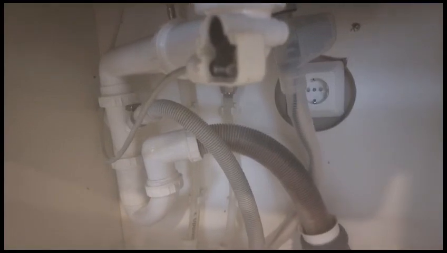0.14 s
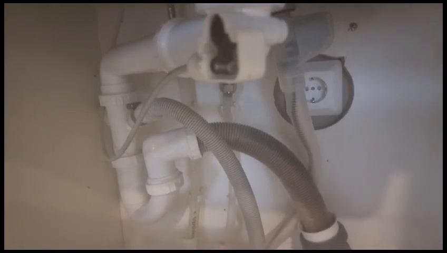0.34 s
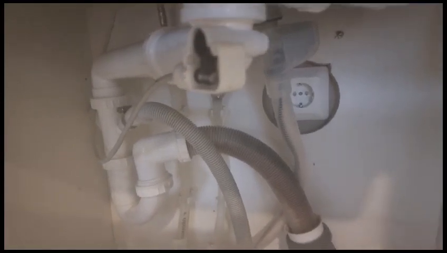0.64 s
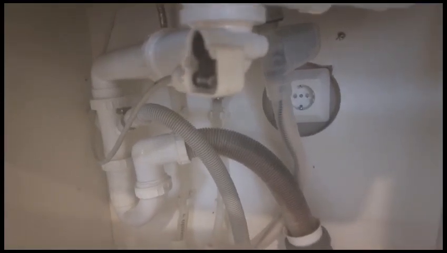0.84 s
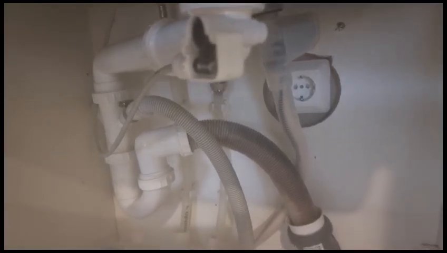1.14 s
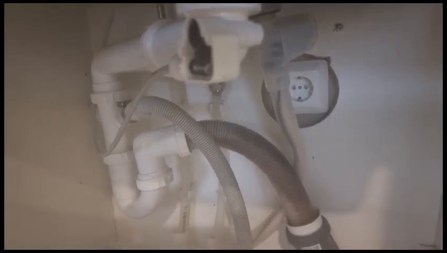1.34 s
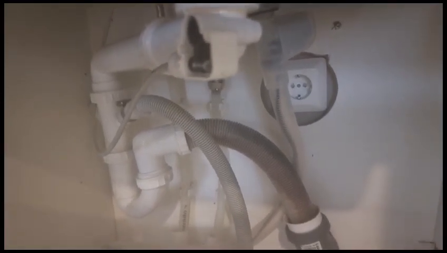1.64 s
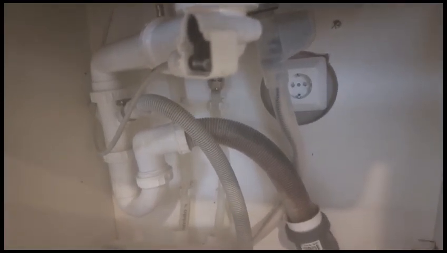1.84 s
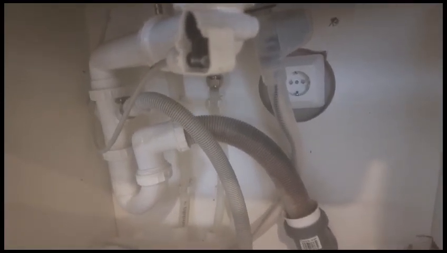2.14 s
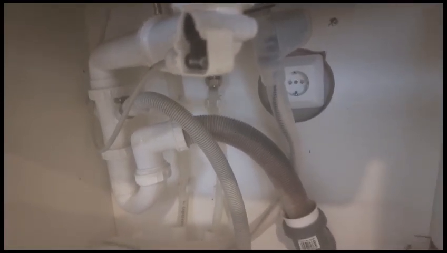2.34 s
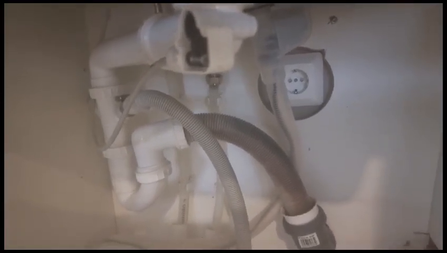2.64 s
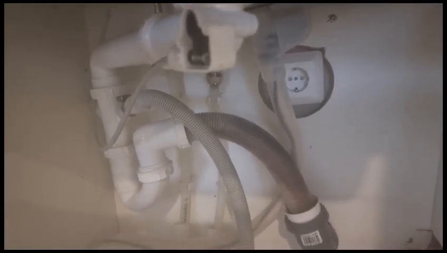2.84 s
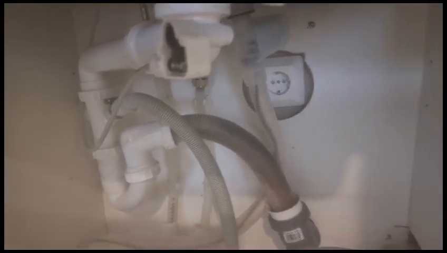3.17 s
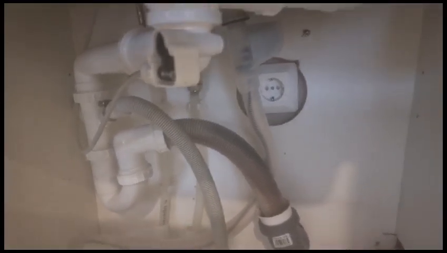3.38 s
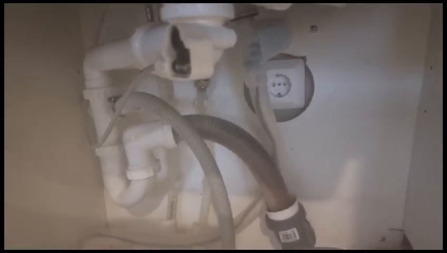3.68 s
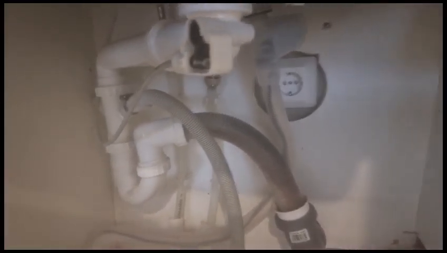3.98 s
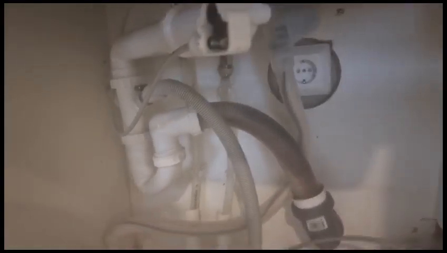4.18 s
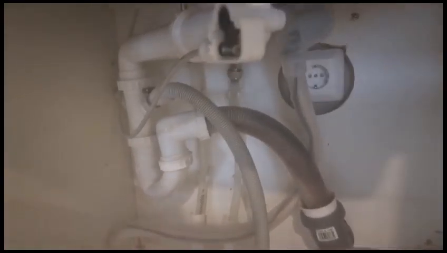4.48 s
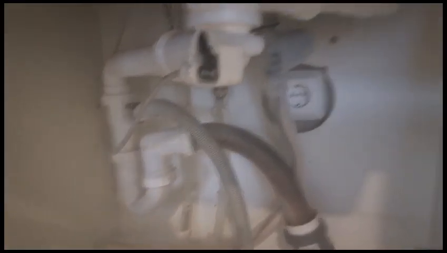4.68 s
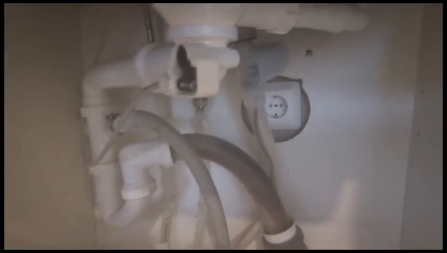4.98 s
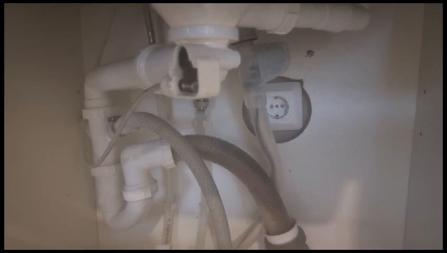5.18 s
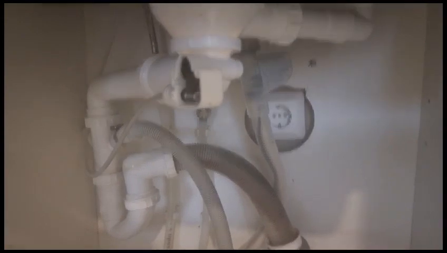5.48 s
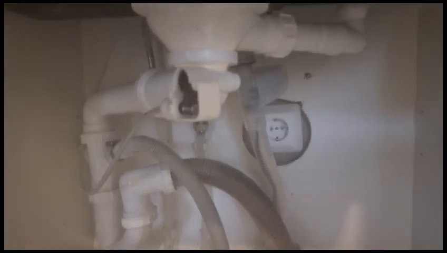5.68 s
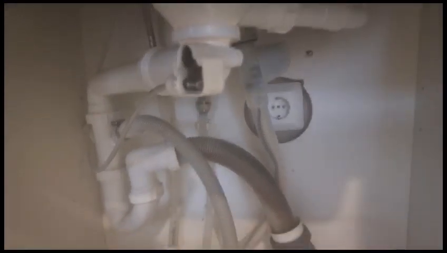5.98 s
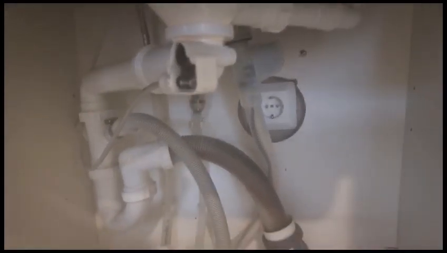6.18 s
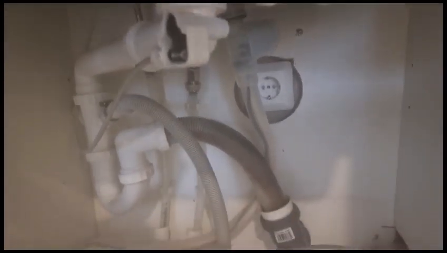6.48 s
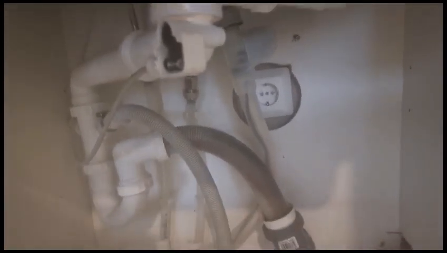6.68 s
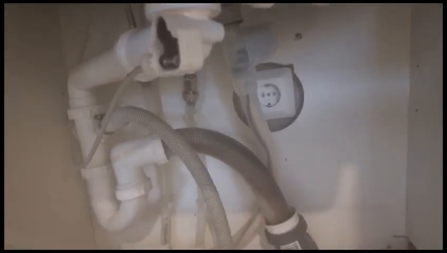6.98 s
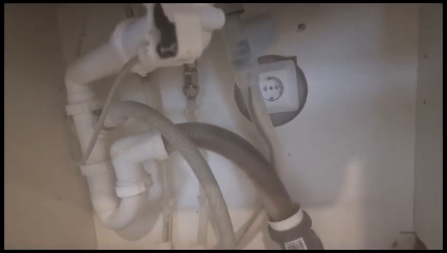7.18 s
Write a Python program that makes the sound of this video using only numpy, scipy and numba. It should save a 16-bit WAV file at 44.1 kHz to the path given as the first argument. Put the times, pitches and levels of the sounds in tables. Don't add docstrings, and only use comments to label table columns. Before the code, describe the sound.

A dense, even roar of running water fills a closed sink cupboard, ringing on a few low hollow notes. It falls away quickly into heavy, dull pipe thumps and gulps of trapped air. Bubbles glug and pop, water knocks the pipe and bright droplets patter, ever sparser. One late dull thump with a plastic click interrupts the last tiny drips. Heard nearby on a phone, dry and boxy.

```python
import sys
import numpy as np
from scipy import signal
from scipy.fft import rfft, irfft, next_fast_len
from scipy.io import wavfile
from scipy.ndimage import uniform_filter1d
from numba import njit

SR = 44100
rng = np.random.default_rng(int(sys.argv[2]) if len(sys.argv) > 2 else 0)


def boost(x):
    u = np.asarray(x, float) / 20
    return 10 ** u


def unload_audio(sound):
    columns = np.transpose(np.atleast_2d(sound))
    steps = np.round(np.clip(columns, -1, 1) * 32767)
    wavfile.write(sys.argv[1], SR, steps.astype(np.int16))


N = 322812

# [f/Hz, level/dB per Hz]
RUSH_COLOUR = [(20, -43), (60, -10), (120, 2), (240, -20), (640, -19.5), (1400, -20), (2100, -15),
               (4000, -17.5), (6400, -12.5), (7600, -15.5), (8700, -25), (12000, -22.5), (14500, -21.5)]
# [f/Hz, width/Hz, lift/dB]
CUPBOARD_MODES = [(92, 22, -2), (117, 11, 6.5), (169.6, 7.9, 10), (282.4, 7.4, 11), (366, 7.8, 12.5),
                  (536, 43, 10), (770, 57, 8.5), (1200, 96, 5)]
# [level/dB], [start of the fall t/s], [fall/dB per s]
TAP_DB, TAP_SHUTS_S, TAP_FALL_DB_PER_S = (-39, -39, -32), (2.655, 2.696, 2.75), (73, 35.5, 49)
TAP_DRY_S = 3.2

# [f/Hz, level/dB per Hz]
KITCHEN_COLOUR = [(20, 8), (90, -10), (280, -20), (480, -22), (1400, -39), (2800, -58), (6400, -12),
                  (9500, -14), (14500, -8)]
# [t/s, boom level/dB, middle level/dB, hiss level/dB]
KITCHEN_LEVELS = [
    (0, -65, -56.5, -85),
    (7.32, -65, -77, -74.5),
]
# [f/Hz, width/Hz, lift/dB]
KITCHEN_MODES = [(95, 27, 12), (361, 23, 14)]
HUM_HZ, HUM_DB = 361, -87.5

# [t/s, peak level/dB, f/Hz,
# ring/cycles]
GULPS = [(2.459, -40, 394, 3.3), (2.561, -36, 366, 51), (2.59, -28.5, 485, 5.7), (2.784, -46, 228, 4),
         (2.861, -35, 452, 12), (2.866, -40.5, 283, 8.2), (2.79, -40.5, 288, 8.8), (2.785, -41, 695, 8),
         (2.689, -37, 292, 6.1), (2.954, -44, 342, 13), (3.061, -49.5, 361, 22), (4.501, -49, 200, 2.8),
         (4.659, -48, 361, 11), (4.697, -44, 368, 4.4), (5.274, -52, 332, 4.2), (6.629, -45.5, 151, 4),
         (6.975, -61, 330, 4), (5.89, -65, 1400, 220), (6.09, -73, 1380, 250), (6.25, -75, 1400, 190),
         (7.06, -79, 1430, 160)]
# [t/s, peak level/dB, f/Hz, push/ms, ring/cycles]
THUDS = [(2.79, -16.5, 92, 21, 0.87), (2.825, -19.5, 85.5, 22, 1.3), (2.872, -16, 88, 7.2, 2.6),
         (2.901, -19, 98, 10.4, 3.5), (2.941, -26, 100, 17, 3.6), (2.996, -33, 83, 14, 4.3),
         (4.015, -43, 112, 31, 5), (4.075, -42, 100, 29, 2.4), (4.492, -38.5, 103.4, 22, 1.2),
         (4.617, -41, 96.9, 26, 1.8), (4.678, -41, 95, 14, 1.6), (6.19, -46.5, 72, 16, 1.7),
         (6.558, -48, 74, 14, 1.8), (6.584, -49, 56.5, 21, 2), (6.64, -41, 53.8, 9, 1),
         (6.975, -43, 92, 23, 3)]
# [t/s, peak level/dB, f/Hz]
CLICKS = [
    (6.631, -51, 400),
    (6.631, -54, 930),
    (6.632, -54, 2300),
    (4.508, -34.5, 67),
]

# [f/Hz, level/dB per Hz]
TRICKLE_COLOUR = [(20, -16), (60, 0.5), (110, 6.5), (200, -21.5), (470, -29.5), (640, -22), (900, -14.5),
                  (2000, -14), (3000, -17), (5000, -15), (6700, -12), (7700, -17), (8700, -26.5),
                  (14500, -25.5)]
# [f/Hz, width/Hz, lift/dB]
EMPTY_PIPE_MODES = [(104, 43, 1.5), (361, 104, 11), (553, 40, 19), (1400, 32, -22)]
# [t/s, flow level/dB, level/dB of the air dragged along]
DRAIN = [(2.9, 14.5, -6), (3.0, 5.5, -3.5), (3.12, -2, 4), (3.26, 2, -0.5), (3.6, 1.5, -0.5),
         (4.03, 0, 2.5), (4.34, -0.5, 1), (4.7, -1, 2.5), (5.07, -2, -2), (5.3, -2, -2), (5.72, -4.5, -8.5),
         (5.84, -10.5, -5.5), (6.26, -19, 7), (6.5, -18.5, -0.5), (6.62, -13.5, -6), (6.8, -26.5, -1.5),
         (7.1, -24, 2.5), (7.33, -21.5, -4.5)]
# [level/dB at 0 dB flow and air], [dB per dB of flow], [dB per dB of
DRAIN_DB, PER_FLOW, PER_AIR = (-54.5, -52.5, -47.5), (0.65, 1.33, 1), (0.97, 0.94, 0)

# [t/s, peak level/dB, f/Hz]
GLUGS = [(2.937, -44, 2230), (3.115, -34, 1730), (3.119, -35.5, 2330), (3.29, -38, 1130),
         (3.419, -29.5, 1200), (3.52, -38, 1960), (3.567, -32, 1950), (3.728, -38, 2200),
         (3.796, -33, 1890), (3.91, -37, 2030), (3.94, -39, 2340), (4.081, -36.5, 920),
         (4.228, -42.5, 1130), (4.285, -45, 1780), (4.318, -38, 1050), (4.382, -29, 1020),
         (4.409, -36, 2040), (4.474, -35.5, 1290), (4.584, -37, 1000), (4.63, -35.5, 1740),
         (4.673, -39.5, 880), (4.026, -41, 770), (5.003, -41, 1970), (5.19, -39.5, 2380),
         (5.275, -45, 1230), (5.571, -46, 2410), (5.869, -51, 960), (5.978, -50, 1320), (6.07, -54, 1420),
         (6.582, -65, 2600), (6.631, -51.5, 1680)]
# [t/s, peak level/dB, f/Hz]
MORE_GLUGS = [(2.91, -34, 1100), (3.085, -31, 1100), (3.182, -41, 1060), (3.22, -39, 2360), (3.253, -37, 2650),
              (3.313, -41, 930), (3.124, -30, 1080), (3.443, -39, 816), (3.479, -40, 1590), (3.507, -38, 800),
              (3.551, -33, 1960), (3.612, -37, 2410), (3.652, -36, 1990), (3.814, -36, 1910), (3.824, -32, 1950),
              (4.043, -42, 810), (4.105, -40, 1220), (4.184, -42, 770), (4.744, -39, 770), (4.86, -48, 1560),
              (4.891, -37, 1090), (4.939, -40, 2460), (4.975, -43, 1950), (5.023, -36, 1220), (5.094, -54, 1730),
              (5.163, -45, 2260), (5.444, -51, 923), (5.544, -40.5, 1300), (5.615, -47, 2540),
              (5.695, -46, 2930), (6.034, -61, 1200), (6.179, -62, 1550), (6.296, -55, 1540), (7.054, -62, 2130),
              (7.164, -60, 1580)]
# [t/s, peak level/dB]
KNOCKS = [(3.039, -40), (3.126, -34.5), (3.205, -46), (3.421, -42.5), (3.65, -47.5), (3.718, -40),
          (3.851, -47.5), (3.985, -45.5), (4.038, -41), (4.08, -38.5), (4.149, -47), (4.183, -53),
          (4.233, -43), (4.288, -38), (4.577, -44.5), (4.63, -43), (4.729, -43.5), (5.006, -45),
          (5.227, -42), (5.285, -48), (5.476, -52), (5.575, -50.5), (5.622, -55), (5.658, -52), (5.87, -43),
          (5.894, -56), (6.037, -57), (6.072, -46.5)]
# [t/s, peak level/dB]
SOFT_KNOCKS = [(2.958, -55), (3.171, -51), (3.23, -54), (3.395, -54), (3.49, -45.5), (3.554, -54),
               (3.616, -52), (3.793, -50), (3.918, -50), (4.112, -56), (4.389, -57), (4.483, -46.5),
               (4.533, -49), (4.683, -52), (4.854, -53), (4.896, -54), (4.98, -43), (5.111, -53),
               (5.191, -54), (5.311, -51)]
# [f/Hz, ring/cycles, level/dB]
PIPE_OVERTONES = [(972, 15, -1), (1370, 97, -7.5), (1790, 8, -1), (1400, 13, 1.5), (759, 12, 1)]
# [t/s, peak level/dB, f/Hz]
SPLASHES = [(3.112, -29, 4700), (3.185, -29, 7400), (3.2275, -26, 6900), (3.319, -22, 6600),
            (3.341, -28.5, 4800), (3.4764, -24, 5100), (3.41, -32, 5600), (3.567, -25.5, 6460),
            (3.7646, -30, 6280), (3.8303, -36, 4130), (3.885, -32, 5970), (3.9417, -31, 5770),
            (4.0136, -33, 5770), (4.096, -29, 5160), (4.187, -29, 6500), (4.295, -29.5, 4800),
            (4.38, -36, 4020), (4.487, -29.5, 5600), (4.6206, -30, 7160), (4.6835, -19, 6430),
            (4.894, -31, 5500), (5.028, -30.5, 5100), (5.102, -33.5, 5550), (5.156, -31.5, 5830),
            (5.2912, -34.5, 7700), (5.32, -33, 5900), (5.515, -37, 7110), (5.645, -37, 7200),
            (5.6865, -38, 6840), (5.7376, -37, 4640),
            (5.765, -45, 2600), (5.783, -32.5, 6100), (5.8697, -33, 6200), (5.897, -48, 3380),
         (5.912, -52, 2550), (6.081, -51, 2500), (5.924, -42.5, 4730), (5.9764, -44, 5700),
         (6.009, -46, 3740), (6.0346, -39, 7600), (6.079, -38, 7400), (6.092, -38, 6100),
         (6.1361, -42, 6230), (6.174, -34, 6650), (6.196, -36.5, 4670), (6.2057, -34, 6630),
         (6.312, -40, 6460), (6.4199, -54, 6230), (6.5102, -41.5, 7900), (6.5586, -60, 6330),
         (6.5836, -44, 3560), (6.648, -33.5, 6260), (6.6963, -42, 7800), (6.7554, -47, 8300),
         (6.905, -44, 7660), (6.9512, -55, 6210), (6.9695, -42, 7260), (6.984, -36, 6460),
         (7.046, -47, 6900), (7.1418, -48, 6140), (7.1824, -40, 7900), (7.2, -37, 5270)]
# [t/s, peak level/dB, f/Hz]
MORE_DROPS = [(3.032, -35, 6360), (3.691, -40, 6900), (3.7314, -47, 6940), (3.7894, -45, 5910),
              (3.9888, -33, 7800), (4.0544, -35, 5420), (4.1165, -37, 5240), (4.1525, -37, 7610),
              (4.3214, -35, 4040), (4.4139, -36, 4780), (4.557, -50, 6360), (4.5685, -38, 4480),
              (4.7444, -36, 7000), (4.8289, -43, 5260), (4.8609, -35, 6610), (4.9387, -41, 3160),
              (4.9706, -45, 5290), (5.2444, -41, 3460), (5.4074, -46, 4060), (5.4444, -37, 6600),
              (5.5014, -38, 6980), (5.5494, -37, 7630), (5.6351, -43, 4970), (5.7044, -35, 7310),
              (5.7563, -39, 7420), (5.8461, -49, 6890), (5.8944, -38, 6900), (6.1044, -42, 7390),
              (6.1604, -43, 6800), (6.2971, -59, 6520), (6.3629, -52, 5250), (6.4602, -49, 6500),
              (6.5695, -46, 6400), (6.605, -44, 6400), (6.7301, -55, 7610), (6.7754, -52, 6260),
              (6.7894, -48, 7580), (6.8598, -52, 6270), (6.8794, -48, 6600), (7.0174, -59, 4890),
              (7.0674, -50, 5880), (7.0824, -48, 7780), (7.1544, -47, 7770), (7.2429, -49, 6550),
              (7.2574, -61, 6130), (7.2774, -57, 4750)]
# [t/s, peak level/dB, f/Hz]
EARLY_MIST = [(3.0743, -48, 13100), (3.1292, -41, 14100), (3.1606, -38, 11100), (3.3018, -41, 10800),
              (3.3182, -46, 13700), (3.3871, -36, 8600), (3.4494, -55, 10700), (3.4739, -41, 13400),
              (3.5517, -44, 10000), (3.6091, -38, 9200), (3.6654, -38, 13100), (3.716, -32, 11600),
              (3.8794, -35, 8650), (3.9633, -45, 15400), (3.9892, -39, 10500), (4.087, -46, 14500),
              (4.1513, -49, 9900), (4.1838, -42, 8700), (4.2282, -34.5, 10200), (4.3224, -38, 10000),
              (4.3793, -44, 15100), (4.4452, -43, 9880), (4.5145, -40, 11300), (4.5938, -42, 12400),
              (4.6332, -40, 10200), (4.6866, -49, 13000), (4.7604, -49, 14600), (4.7849, -50, 13700),
              (4.9705, -43, 10800), (5.156, -48, 9280), (5.2907, -51, 8620), (5.3212, -42, 9270),
              (5.4274, -49, 10600), (5.4623, -46, 12700), (5.5342, -45, 13500), (5.6489, -43, 9390),
              (5.6953, -39, 10400), (5.7392, -56, 9890), (5.7552, -51, 10200), (5.7796, -51, 13700)]
# [t/s, peak level/dB, f/Hz]
LATE_MIST = [(5.8678, -42, 8600), (5.894, -40, 9600), (6.0115, -46, 15500), (6.0743, -45, 8510),
             (6.206, -43, 12300), (6.3003, -57, 12600), (6.3128, -47, 8930), (6.4131, -45, 8650),
             (6.5093, -54, 8770), (6.5742, -53, 11700), (6.5892, -44, 9460), (6.647, -48, 8760),
             (6.6804, -51, 9920), (6.73, -48, 9600), (6.755, -42, 13700), (6.8605, -51, 11100),
             (6.8785, -45, 10600), (6.9049, -46, 9100), (6.9513, -45, 14600), (6.9828, -44, 11700),
             (7.0496, -46, 12300), (7.1244, -55, 13500), (7.1419, -43, 14300), (7.1817, -46, 8660),
             (7.2571, -44, 13000)]
# [t/s, peak level/dB]
SNAPS = [(3.3187, -34), (3.3875, -36), (3.4752, -34), (3.9417, -44), (4.3795, -43), (5.156, -42),
         (5.7828, -42), (6.1361, -52), (6.5586, -53), (6.648, -42), (6.6966, -52), (6.7309, -53),
         (6.7542, -47), (6.8605, -54), (6.9047, -51), (6.9514, -55), (7.1419, -47)]

# [f/Hz, left minus right level/dB]
PORT_BALANCE = [(60, -9), (110, 0), (200, -2.5), (380, -2), (700, -1.5), (1290, -5), (2300, -4), (3200, 4),
                (4700, 3), (6400, 1), (8300, -4.5), (10500, -3), (15000, 2)]
# [f/Hz, correlation]
LIKENESS = [(30, 0.49), (60, 0.95), (150, 1), (300, 0.76), (600, 0.76), (1200, 0.061), (2500, 0.043),
            (5000, 0.0061)]

ZONE_EDGES_HZ = (225, 2700)
LEFT_LAG_S, NEAR_LAG_S = 0.00037, 0.00005
MORE_GLUGS_DB, MORE_DROPS_DB, EARLY_MIST_DB = -3.5, 1, 1
FIZZ_DB, FIZZ_PER_DROP = -12, 0.2
OVERTONES_DB, OVERTONES_PER_FLOW = -7, -0.23


def on_log_axis(table, hz):
    points = np.array(table, float)
    return np.interp(np.log(np.maximum(hz, 1)), np.log(points[:, 0]), points[:, 1])


def shifted(table, db):
    return [(s, peak_db + db, hz) for s, peak_db, hz in table]


@njit
def grains(start, hz, cycles, size, rise, glide, attack, length):
    out = np.zeros(length)
    for k in range(len(start)):
        ring = 2.5 * cycles[k] * SR / hz[k]
        count = min(int(ring + 3 * attack[k] * SR), length - start[k])
        fall = np.exp(-2.3 * hz[k] / (cycles[k] * SR))
        phase, step, body = 0., hz[k] / SR, size[k]
        for i in range(count):
            swell = min(1., i / (attack[k] * SR))
            out[start[k] + i] += body * swell * np.sin(2 * np.pi * phase)
            phase += step
            step = min(step * (1 + glide * hz[k] / (cycles[k] * SR)), rise * hz[k] / SR)
            if i > attack[k] * SR:
                body *= fall
    return out


def placed(s, db, hz, cycles, rise, glide, attack_s):
    start, each = (np.asarray(s) * SR).astype(np.int64), np.ones(len(s))
    cycles = np.maximum(cycles, 1.) * each
    return grains(start, hz * each, cycles, boost(db), float(rise), float(glide), attack_s * each, N)


def patter(length, rate, scatter_db, fade_s):
    chance, hits = rng.random(length) * SR / rate, np.zeros(length)
    struck = chance < 1
    hits[struck] = boost(-2 * scatter_db * np.log(chance[struck] + 0.017))
    power = signal.lfilter([1], [1, -np.exp(-1 / (fade_s * SR))], hits)
    return power / np.mean(power)


def port_spectra(size, colour, modes):
    hz = np.arange(size // 2 + 1) * SR / size
    gain = boost(on_log_axis(colour, hz))
    for mode_hz, width, lift_db in modes:
        gain = gain * (1 + (boost(lift_db) - 1) / (1 + (2 * (hz - mode_hz) / width) ** 2))
    right, other = rfft(rng.standard_normal((2, size))) * gain
    alike = np.clip(on_log_axis(LIKENESS, hz), 0, 1)
    lag_s = LEFT_LAG_S * np.clip(hz / 900, .2, 1)
    left = alike * right * np.exp(-2j * np.pi * hz * lag_s) + np.sqrt(1 - alike ** 2) * other
    return hz, np.array([left, right])


def flow(table, colour, modes, rate, scatter_db, fade_s, shared, steady, boom_steady, together=None):
    s, *levels_db = np.transpose(table)
    first = int(s[0] * SR)
    length = min(int(s[-1] * SR), N) - first
    size = next_fast_len(length)
    hz, spectra = port_spectra(size, colour, modes)
    octave = np.log2(np.maximum(hz, 1) / 20)
    together = patter(length, rate, scatter_db, fade_s) if together is None else together[:length]
    zones = np.zeros((3, 2, length), np.float32)
    for centre in np.arange(0, 10, .5):
        band = slice(np.searchsorted(octave, centre + .5) + 1)
        window = np.cos(np.pi * np.clip(octave[band] - centre, -.5, .5)) ** 2
        noise = irfft((spectra[:, band] * window).astype(np.complex64), size)[:, :length]
        zone = np.searchsorted(ZONE_EDGES_HZ, 20 * 2 ** centre)
        power = shared * together + (1 - shared) * patter(length, rate, scatter_db, fade_s)
        calm = steady if zone else boom_steady
        zones[zone] += noise * np.sqrt(calm + (1 - calm) * power, dtype=np.float32)
    out, time = np.zeros((2, N)), (first + np.arange(length)) / SR
    since_start = time - s[0] + (first == 0)
    until_end = s[-1] - time + (first + length > N - 9)
    fade = np.clip(np.minimum(since_start, until_end) / 0.073, 0, 1)
    for ports, db in zip(zones, levels_db):
        level = boost(np.interp(time, s, db)) / np.std(ports.mean(axis=0))
        out[:, first:first + length] += ports * fade * level
    return out


def cupboard_tail(x, t60_s, tail_db, pan_db, lag_s):
    time = np.arange(int(.2 * SR)) / SR
    decay = boost(-60 * time / t60_s) + 1.3 * np.exp(-time / 0.004)
    echo = rng.standard_normal((2, len(time))) * decay * np.clip(time / 0.0016, 0, 1)
    echo *= boost(tail_db) / np.sqrt(np.sum(echo ** 2, axis=1, keepdims=True))
    echo[[0, 1], [int(lag_s * SR), 0]] = 1
    pan = boost(np.array([[pan_db], [-pan_db]]) / 2)
    return signal.fftconvolve(x[None], echo * pan, axes=1)[:, :N]


def tap_rush():
    s = np.arange(0, TAP_DRY_S + .01, .02)
    parts = zip(TAP_DB, TAP_SHUTS_S, TAP_FALL_DB_PER_S)
    levels = [db - fall * np.maximum(s - shut, 0) for db, shut, fall in parts]
    return flow(np.transpose([s, *levels]), RUSH_COLOUR, CUPBOARD_MODES, rate=1400, scatter_db=9.5,
                fade_s=0.0068, shared=0.33, steady=0.79, boom_steady=0.89)


def kitchen():
    return flow(KITCHEN_LEVELS, KITCHEN_COLOUR, KITCHEN_MODES, rate=60, scatter_db=2.0,
                fade_s=.02, shared=.3, steady=.9, boom_steady=0.75)


def hum():
    waver = uniform_filter1d(rng.standard_normal(N), size=4000) * 60
    return boost(HUM_DB + 1.5 * waver) * np.sin(2 * np.pi * np.cumsum(HUM_HZ + 1.34 * waver) / SR)


def gulps():
    s, db, hz, cycles = np.transpose(GULPS)
    return placed(s, db + 1.5, hz, cycles, 1.007, 0.12, 0.0021)


def thuds():
    s, db, hz, push_ms, cycles = np.transpose(THUDS)
    return placed(s, db + 0.5, hz, cycles, 1.02, .1, push_ms / 1000)


def clamp_clicks():
    return placed(*np.transpose(CLICKS), 1.3, 1.05, .05, 0.0012)


def drain_levels():
    s, flow_db, air_db = np.transpose(DRAIN)
    parts = zip(DRAIN_DB, PER_FLOW, PER_AIR)
    return np.transpose([s, *(db + a * flow_db + b * air_db for db, a, b in parts)])


def stirring(s, db, hz, spray_db, fade_s=0.0099):
    hits = np.zeros(N)
    hits[(s * SR).astype(int)] = boost(db - spray_db)
    power = signal.lfilter([1], [1, -np.exp(-1 / (fade_s * SR))], hits)[int(DRAIN[0][0] * SR):]
    return 0.03 + power / np.mean(power)


def trickle(fall):
    return flow(drain_levels(), TRICKLE_COLOUR, EMPTY_PIPE_MODES, rate=110, scatter_db=2.6, fade_s=0.0091,
                shared=0.43, steady=0.07, boom_steady=0.93, together=stirring(*fall))


def small_bubbles(count=1150, low_hz=650, octaves=3.3, scatter_db=4.0, lift_db=3.5):
    s, _, pipe_db, spray_db = drain_levels().T
    chance = rng.random((count, 4)).T
    time = s[0] + (s[-1] - s[0] - .02) * chance[0]
    hz = low_hz * 2 ** (octaves * chance[1])
    bright_db = np.interp(time, s, spray_db) + 1.0 + on_log_axis(TRICKLE_COLOUR, hz)
    db = np.where(hz < ZONE_EDGES_HZ[1], np.interp(time, s, pipe_db), bright_db)
    db = db + lift_db - scatter_db * np.log(chance[2] + 0.77)
    return placed(time, db, hz, 3.5 + 6 * chance[3], 2.9, 0.18, 0.0013)


def glugs():
    s, db, hz = np.transpose(GLUGS + shifted(MORE_GLUGS, MORE_GLUGS_DB))
    late, softer, pitch = rng.random((len(s), 3)).T
    bubble = placed(s, db - 1.5, hz, 15, 1.3, 0.033, .002)
    burst = placed(s + .012 * late, db - 7 - 6 * softer, hz * 1.8 ** (pitch - .4), 8, 1.2, .1, .001)
    return bubble + burst


def knocks():
    s, db = np.transpose(KNOCKS + SOFT_KNOCKS)
    hz = 550 * (1 + 0.012 * rng.standard_normal(len(s)))
    return placed(s, db + 0.5, hz, 11.5, 1, 0, 0.0061)


def knock_overtones():
    s, db = np.transpose(KNOCKS)
    db = db + OVERTONES_DB + OVERTONES_PER_FLOW * np.interp(s, *np.transpose(DRAIN)[:2])
    return sum(placed(s - .002, db + rel_db, hz, cycles, 1, 0, .0018) for hz, cycles, rel_db in PIPE_OVERTONES)


def drops():
    s, db, hz = np.transpose(SPLASHES + shifted(MORE_DROPS, MORE_DROPS_DB))
    return s, db, hz, np.interp(s, *drain_levels().T[[0, 3]])


def splashes(s, db, hz, spray_db):
    ring = placed(s, db - 5.5, hz, 24, 1, 0, 0.00036)
    tick = placed(s, db - 2.0, 1.064 * hz, 4.8, 1, 0, 0.00034)
    fizz_db = spray_db + FIZZ_DB + FIZZ_PER_DROP * (db - spray_db)
    late, pitch = np.moveaxis(rng.random((len(s), 6, 2)), 2, 0)
    fizz_s, fizz_hz = s[:, None] + 0.0091 * late ** 3, 8000 * 1.6 ** pitch
    fizz = placed(fizz_s.ravel(), np.repeat(fizz_db, 6) + 0.5, fizz_hz.ravel(), 7.1, 1.4, 0.048, 0.00029)
    return ring + tick + fizz


def mist(lasts_s=0.011, spread=0.48, lift_db=-6):
    s, db, hz = np.transpose(LATE_MIST + shifted(EARLY_MIST, EARLY_MIST_DB))[..., None]
    late, pitch = np.moveaxis(rng.random((len(s), 12, 2)), 2, 0)
    at = np.minimum(s + lasts_s * late ** 2, N / SR - .01)
    db = db + lift_db - 12 * late
    hz = np.clip(hz * 2 ** (spread * (pitch - .5)), 7000, 15600)
    return placed(at.ravel(), db.ravel(), hz.ravel(), 23, 1, 0, 0.00018)


def snaps():
    s, db = np.transpose(SNAPS)
    heights = [(14500, 2), (9500, -1), (4500, -7)]  # f/Hz, level/dB
    return sum(placed(s, db + 3 + rel_db, hz, 2.4, 1, 0, 0.0001) for hz, rel_db in heights)


def scene():
    fall = drops()
    steady = tap_rush() + kitchen() + hum()
    pipes = gulps() + thuds() + clamp_clicks()
    bubbles = cupboard_tail(small_bubbles() + glugs() + knock_overtones(), 0.077, -4.5, -5.0, LEFT_LAG_S)
    column = cupboard_tail(knocks(), 0.035, 2.0, -1.0, LEFT_LAG_S)
    spray = cupboard_tail(splashes(*fall) + mist(), 0.13, 0.5, -2.6, NEAR_LAG_S)
    hard = cupboard_tail(snaps(), 0.07, -5, -2.6, NEAR_LAG_S)
    return steady + pipes + trickle(fall) + bubbles + column + spray + hard


def low_pass(x):
    return signal.sosfilt(signal.butter(12, 17000, fs=SR, output="sos"), x)


def record(dry):
    top_hz, edge_hz, bass_hz = 15790, 60, 45.0
    size = next_fast_len(N)
    hz = np.arange(size // 2 + 1) * SR / size
    tilt_db = on_log_axis(PORT_BALANCE, hz) / 2
    top_cut = np.sin(np.pi / 2 * np.clip((top_hz + edge_hz / 2 - hz) / edge_hz, 0, 1)) ** 2
    bass_cut = hz ** 3 / np.sqrt(hz ** 6 + bass_hz ** 6)
    gain = boost(np.array([tilt_db, -tilt_db])) * top_cut * bass_cut
    mix = irfft(rfft(dry, size) * gain, size)[:, :N]
    return low_pass(mix)


dry = scene()
out = record(dry)
unload_audio(out)
```